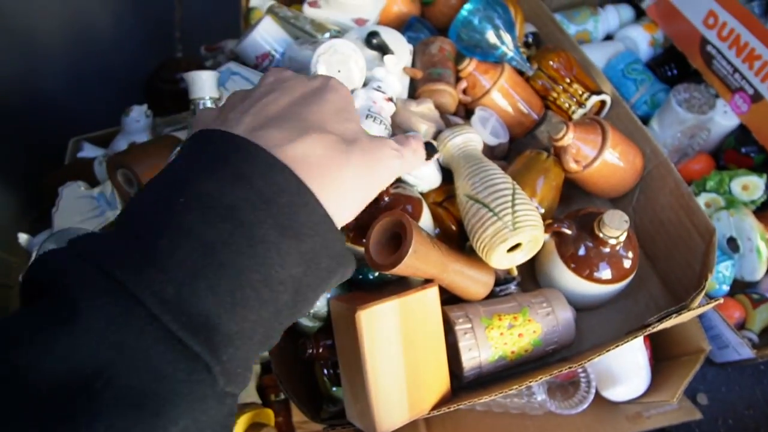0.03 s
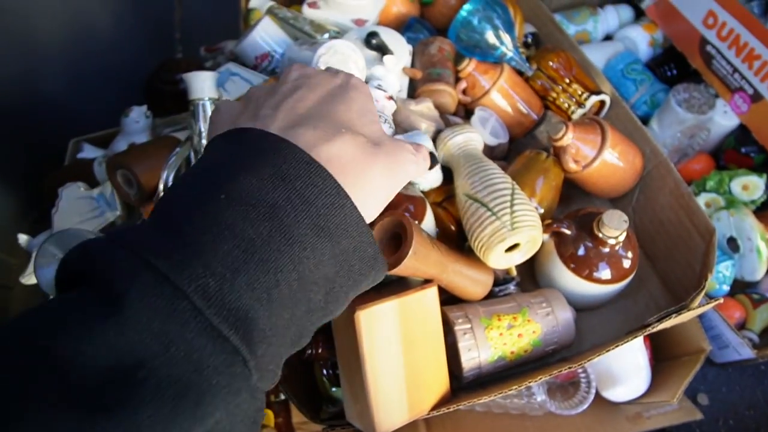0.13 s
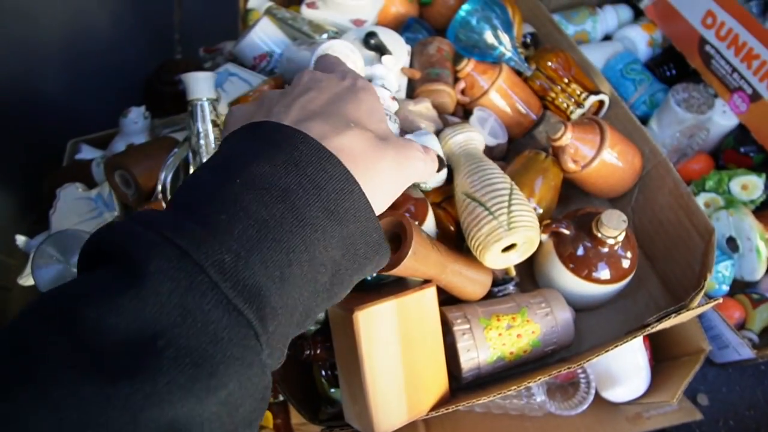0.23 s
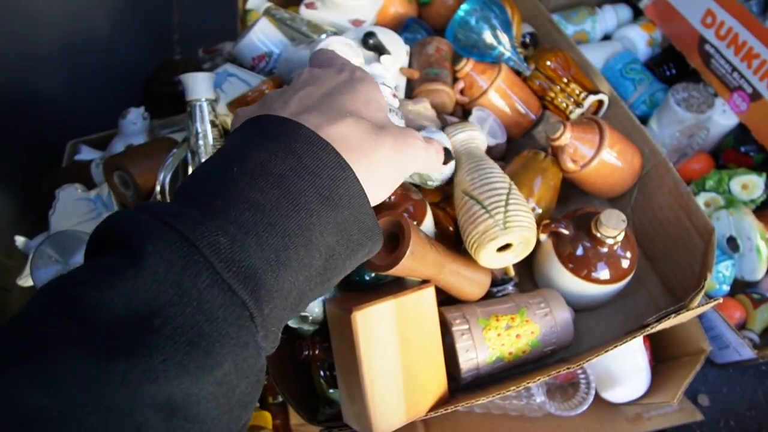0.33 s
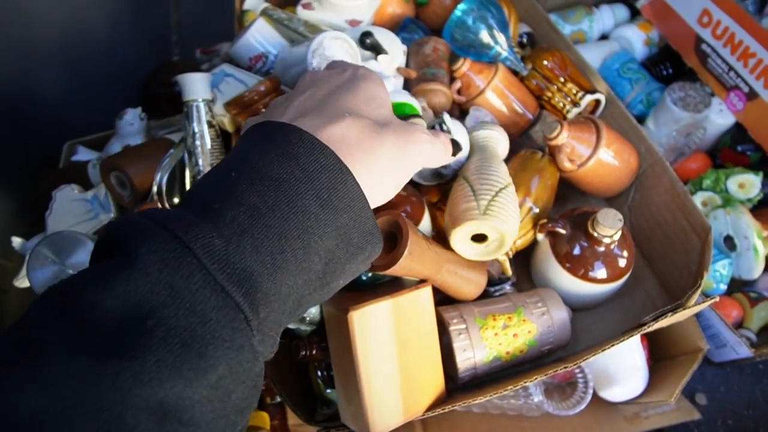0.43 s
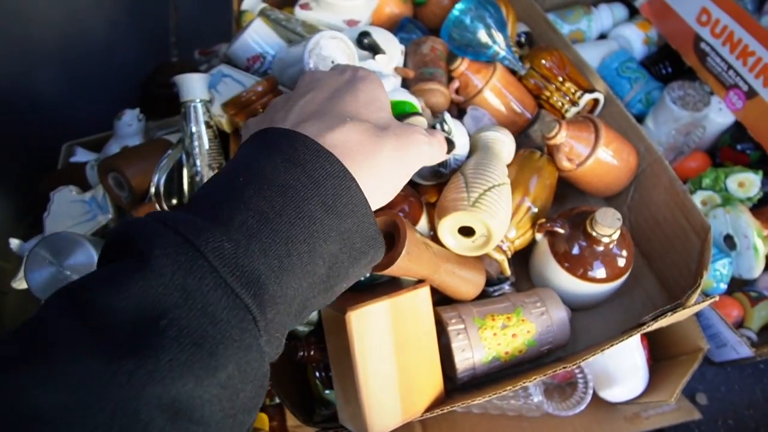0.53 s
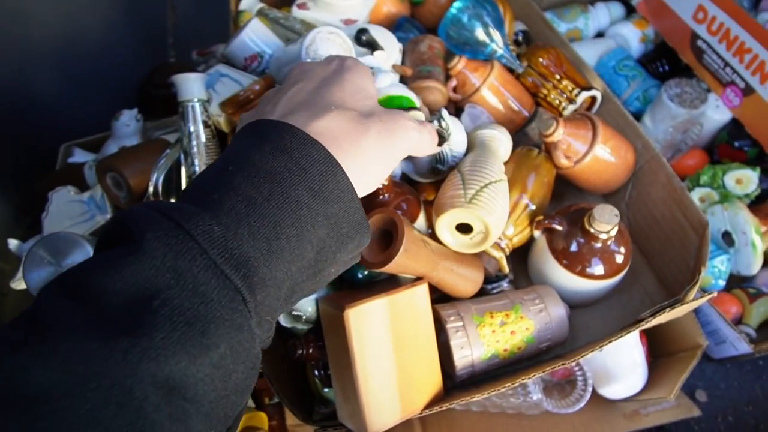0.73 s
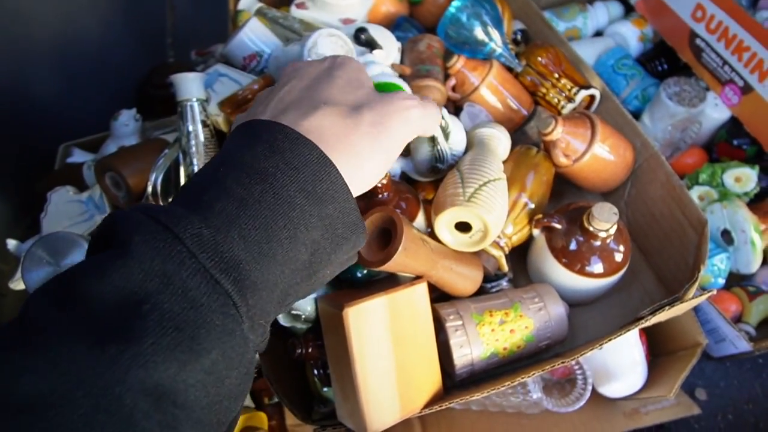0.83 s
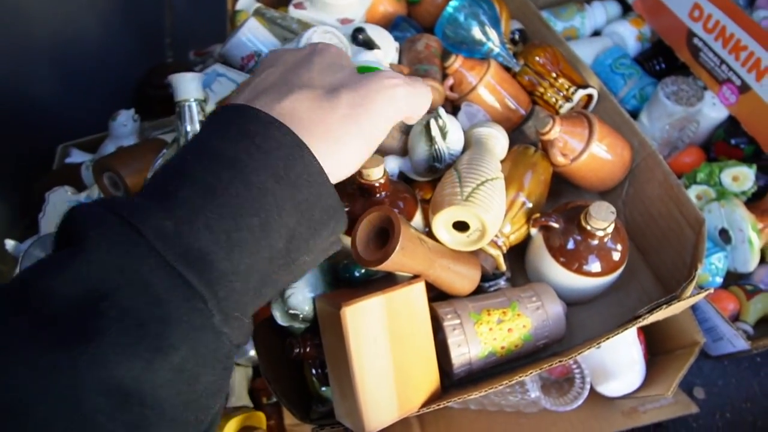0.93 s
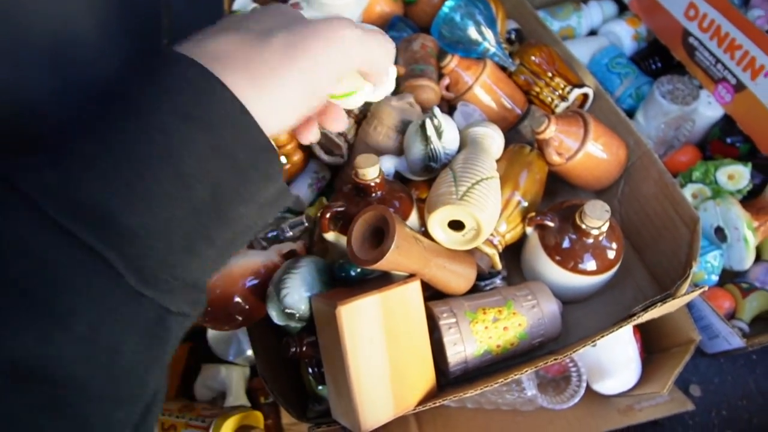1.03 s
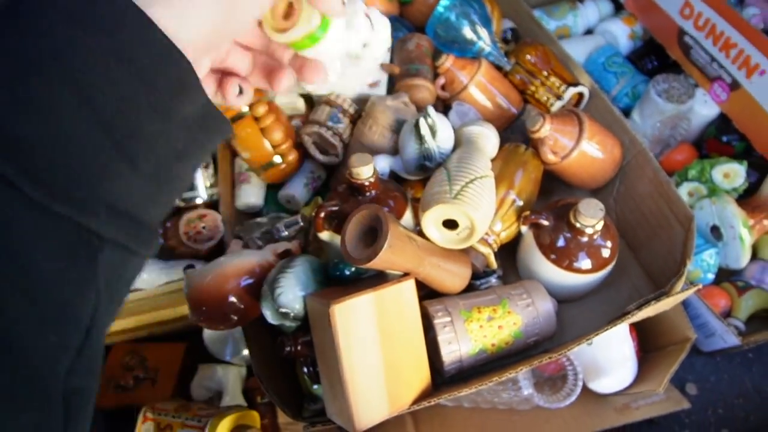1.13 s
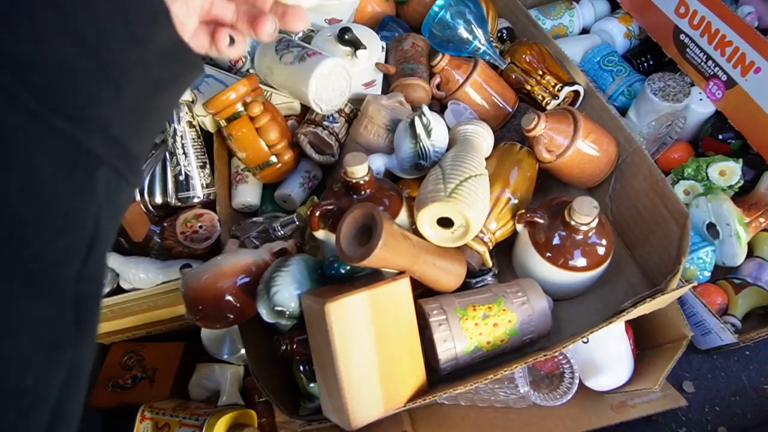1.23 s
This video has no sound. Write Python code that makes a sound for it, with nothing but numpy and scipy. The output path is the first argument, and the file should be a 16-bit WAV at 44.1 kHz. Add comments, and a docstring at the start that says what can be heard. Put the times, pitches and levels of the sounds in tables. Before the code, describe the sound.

Close stereo pickup of ceramic pieces clattering in a cardboard box: faint grating, two bursts of hard clacks with short high clinks, scattered lighter knocks, a tiny hiss of sliding, and a soft closing thud over quiet indoor air.

```python
"""A hand rummages in a cardboard box full of ceramic and glass shakers, close to the microphone, indoors.
Over quiet room noise, glaze first grates on glaze as many tiny slips, and a sleeve's filtered noise swells.
Shakers then knock in quick clusters: contact pulses clack, excite damped modes, scatter through the pile and
thud into the box; some leave thin high rings, and rims tick. Knocks thin out after the densest clusters.
Late on, a gritty hiss swells as a shaker slides along its neighbour and slips off; last comes a dull box knock."""
import sys
import numpy as np
from scipy import signal
from scipy.fft import rfft, irfft
from scipy.io import wavfile

SR = 44100
rng = np.random.default_rng(int(sys.argv[2]) if len(sys.argv) > 2 else 0)


def wrap_up_sound(samples):
    """Save the sound to the file named by the first command line argument, as 16-bit audio."""
    columns = np.atleast_2d(samples).T
    # keep every value between -1 and 1, then stretch to whole-number steps
    tamed = np.clip(columns, -1, 1)
    steps = np.round(tamed * 32767).astype(np.int16)
    wavfile.write(sys.argv[1], SR, steps)


N = 57330  # length in samples

# Spectrum of the steady air noise. Each row: frequency in Hz, relative level in dB.
AIR_SPECTRUM = [(15, -56), (25, -38), (185, -12.5), (384, -7), (863, -3.5), (1740, -8.5), (16000, -35.5)]
# Rustle of the sleeve. Each row: time in seconds, level in dB.
SLEEVE_LEVEL = [(0, -85), (.15, -60), (0.348, -49.5), (.65, -54.5), (.85, -59.5), (1.03, -53.5),
                (1.14, -56.5), (1.18, -60), (1.3, -51.5)]
# Spectrum of sliding cloth. Each row: frequency in Hz, relative level in dB.
CLOTH_SPECTRUM = [(200, -10), (1000, 1), (3000, -3), (5000, 1), (6800, -8.5), (9000, -11.5), (15000, -28.5)]
# Difference signal between the ears. Each row: frequency in Hz, level relative to the middle in dB.
SIDE_SPECTRUM = [(60, -17), (300, -22), (2000, -20), (5000, -11), (12000, -10)]
# Reverberation of the room. Each row: frequency in Hz, time to fall 60 dB in seconds.
ROOM_T60 = [(150, 1), (1000, 0.186), (4000, 0.17), (14000, 0.22)]
# Glaze grating on glaze. Each row: start in seconds, length in seconds, level at the height of the push in dB.
GRATES = [(0.181, 0.14, -40), (0.387, 0.18, -39.5)]
# Spectrum of the grating. Each row: frequency in Hz, relative level in dB.
GRATE_SPECTRUM = [(100, -19), (400, 7.5), (800, 16), (2000, 11.5), (4500, -1.5), (9000, -8), (15000, -39)]
# Light ticks of rim on rim. Each row: start in seconds, level in dB, pitch in Hz.
TICKS = [(.2125, -33, 9800), (0.4364, -21.5, 6900), (1.267, -27.5, 10400), (1.2826, -23.5, 4600)]
# Contacts in the pile. Each row: start in seconds, clack level in dB, contact knee in Hz,
# fall above the knee in dB per octave, box thud level in dB, body that is struck.
KNOCKS = [(0.1948, -4.5, 3300, 23.5, -15.5, "pile"), (.2125, -13, 3830, 14, -15, "vase"),
          (.227, -7.5, 2970, 12, -5, "vase"), (0.2422, 3, 2070, 11, -8, "jar"),
          (0.2466, 3, 2600, 25, -16.5, "jar"), (0.2952, -2.5, 2140, 13, -8.5, "vase"),
          (.399, -12, 750, 19, -27, "pot"), (.445, 8.5, 2770, 15, -6, "pile"),
          (0.4659, 7, 3370, 18, -5, "pile"), (.473, 3, 4100, 29, -4.5, "mug"),
          (0.495, -1, 2010, 10.5, -6, "vase"), (.503, 4.5, 2640, 14, -1, "pile"),
          (.510, 9, 3840, 13, -3, "pile"), (0.523, 1.5, 3230, 21, -11, "pile"),
          (.558, 12.5, 2750, 15.5, -3.5, "jug"), (.5850, 1.5, 2670, 13, -9, "jug"),
          (.589, -5.5, 1390, 27, -18, "pot"), (0.687, -19, 1600, 16, -21.5, "jug"),
          (0.715, -8.5, 1883, 16, -42, "bowl"), (0.7226, -7.5, 1870, 13, -18, "bowl"),
          (0.7883, -12.5, 1940, 14, -22, "jug"), (.899, -7, 4270, 13, -33, "lid"),
          (.906, -17.5, 404, 6, -22.5, "box"), (0.9344, -19, 3260, 11, -27, "mug"),
          (0.979, 6, 4210, 22.5, -10, "mug"), (1.152, -11, 6600, 15.5, -55, "cap"),
          (1.2678, -11.5, 1070, 7.5, -15.5, "box")]
# Damped modes of the bodies wedged in the pile, and of the box.
# Each row of a body: frequency in Hz, relative level in dB, time to fall 60 dB in seconds.
BODY_MODES = {"pile": [(932, 7.5, 0.049), (1170, -4.5, 0.18), (1600, -9, 0.0395), (2290, 1.5, 0.039),
              (2540, -0.5, 0.051)], "jar": [(582, 14, 0.071), (993, 17.5, 0.0457), (1530, 1.5, 0.022),
              (1930, 3, 0.039), (3060, 15, 0.038)], "vase": [(470, 13, .06), (745, 4, .065),
              (1287, -2, .05), (1776, -3, .048), (3200, -4, .025), (4027, -4, .04)], "pot": [(700, 0, .07),
              (1281, -5, .05)], "jug": [(771, 10.5, 0.064), (1106, -3, 0.041), (1730, 10.5, 0.028),
              (2723, 8.5, 0.017), (3780, -1, 0.017)], "mug": [(716, 14.5, 0.13), (1147, 11, 0.18),
              (1437, 9, 0.12), (2060, 8, 0.055), (2690, 18.5, 0.039), (4070, 5, 0.086), (4800, -7, 0.015),
              (5040, 15.5, 0.032)], "lid": [(2300, 10, .038), (2770, 10, 0.014), (4600, -22, 0.11)],
              "bowl": [(1077, 1, .045), (1723, 2, 0.034)], "cap": [(3470, 0, 0.016), (7300, 1.5, 0.0099)],
              "box": [(295, 6, 0.11), (445, 3.5, 0.065), (936, -9, 0.058), (1440, -2, 0.048)]}
# Scattering among the shakers. Each row: frequency in Hz, time to fall 60 dB in seconds.
SCATTER_T60 = [(300, 0.055), (1000, 0.044), (3000, 0.034), (14000, 0.044)]
# Spectrum of the thud in the box. Each row: frequency in Hz, relative level in dB.
BOX_SPECTRUM = [(40, -34), (120, -35), (200, -13), (280, -6), (470, 5), (740, 5), (1100, -7), (2000, -2.5),
                (6000, -49.5)]
# High rings left by some contacts. Each row: start in seconds, level in dB, shaker that rings.
CLINKS = [(.196, -27, "thin"), (.243, -11.5, "china"), (.242, -20, "thin"), (0.266, -18.5, "thin"),
          (.415, -21, "china"), (.445, -16, "glass"), (.466, -8.5, "glass"), (0.472, -9.5, "china"),
          (0.494, -9.5, "china"), (0.5109, 10, "small"), (0.513, 5, "china"), (0.514, -8.5, "glass"),
          (0.559, -1.5, "stoneware"), (.899, -21.5, "lid"), (.979, -14, "china"), (1.268, -29, "lid")]
# Free modes of the ringing shakers.
# Each row of a shaker: frequency in Hz, relative level in dB, time to fall 60 dB in seconds.
RING_MODES = {"china": [(5735, 0, .055), (6021, -10, .06)], "glass": [(8089, 0, .125), (8857, -8, .11),
              (9884, -4, .07), (13430, -25, .12)], "thin": [(8200, 0, .06), (9130, -3, .025),
              (11990, -14, .08)], "small": [(7775, -9, .025), (7937, 0, .033), (12230, -26, .035)],
              "stoneware": [(5421, -1, .04), (5712, 1, .04), (6020, -2, .045), (8086, -9, .08),
              (9916, -8, .058), (13540, -25, .06)], "lid": [(5100, -3, .05), (8830, 0, .1)]}
# Position of the hand in the box. Each row: time in seconds, left level minus right level in dB.
HAND_PAN = [(.3, -0.5), (.56, -1), (.75, -4), (.9, 1.5), (1.0, 0.7), (1.27, -1.5)]
# Position of each ringing shaker. Each entry: shaker, left level minus right level in dB.
RING_PAN_DB = {"china": -6, "glass": -3, "thin": -2.5, "small": -4.5, "stoneware": -3.5, "lid": -3}

AIR_DB, HUM_DB, HUM_HZ, HUM_WIDTH_HZ = -54.5, -70, 191.3, 17.4
AMBIENT_WIDTH_DB = 9  # steady sounds are wider than the knocks
ROOM_DB = -22.5
SCRAPE_DB, SCRAPE_END_S = -47, 1.148  # level at the end, before the grit modulates it
SCRAPE_RISE_S = 0.03  # the level grows by a factor e in this time
SCRAPE_HZ, SCRAPE_WIDTH_HZ, SCRAPE_GRIT_HZ = 6600, 2500, 600
GRATE_SLIPS_PER_S = 1000
TICK_CYCLES = 9.6  # cycles in which a tick falls 60 dB
TICK_SCATTER_DB, TICK_T60_S = -11, 0.045
RISE_DB_PER_OCT, LOW_CUT_HZ = 3, 800  # contact spectrum below its knee
CRACK_DB, CRACK_CYCLES = 1, 8  # the wall flexes at the knee, falling 60 dB in this many cycles
SCATTER_DB, SCATTER_RISE_S = 8.5, 0.00064
BODY_DB = 3.5  # modes, relative to the direct pulse, as are crack and scatter
FORMANT_DB, FORMANT_WIDTH_HZ = 8, 240  # a body passes the contact best near its modes
SHADOW_HZ = 7960  # the hand shades the direct sound above this; the treble arrives by reflections
BOX_RISE_S, BOX_T60_S = 0.003, 0.063
RING_RISE_S = 0.0034
RING_LAG_S = 0.000009  # the left side hears the rings this much later
NEIGHBOURS_DB = -11.5  # touching shakers ring along faintly
NEIGHBOURS_LOW_HZ, NEIGHBOURS_HIGH_HZ = 3300, 10500
NEIGHBOURS_T60_S = 0.03  # middling value: each partial takes 0.5 to 2 times this
EDGE_HZ = 15700


def amp(db):
    """Level law: decibels become an amplitude ratio."""
    return 10 ** (np.asarray(db) / 20)


def unit(x):
    """Energy normalisation: the mean energy per channel becomes one."""
    return x / np.sqrt(np.mean(np.sum(x ** 2, -1)) + 1e-20)


def read(points, hz):
    """Interpolation on a logarithmic frequency axis."""
    table_hz, value = np.transpose(points)
    return np.interp(np.log(hz + 1), np.log(table_hz), value)


def add(mix, start_s, sound):
    """Superposition: a sound is summed into the mix from its start time."""
    part = mix[:, max(round(start_s * SR), 0):][:, :sound.shape[-1]]
    part += sound[..., :part.shape[-1]]


def pan(db):
    """Interaural level difference, split equally between the two channels."""
    return amp(np.array([[db], [-db]]) / 2)


def noise(size, width_db=0):
    """Partial coherence: the two sides share a middle noise, less so in the treble than in the bass."""
    mid, side = rng.standard_normal((2, size))
    side_gain = amp(width_db + read(SIDE_SPECTRUM, np.fft.rfftfreq(size, 1 / SR)))
    side = irfft(rfft(side) * side_gain, size)
    return mid + np.array([side, -side])


def colour(x, points):
    """Spectral filtering of a full-length sound, scaled to an rms of one."""
    gain = amp(read(points, np.fft.rfftfreq(N, 1 / SR)))
    return unit(irfft(rfft(x) * gain, N)) * np.sqrt(N)


def band(centre_hz, width_hz):
    """Narrow-band noise: a Gaussian resonance filters white noise, scaled to an rms of one."""
    hz = np.fft.rfftfreq(N, 1 / SR)
    resonance = np.exp(-((hz - centre_hz) / width_hz) ** 2)
    return unit(irfft(rfft(noise(N)) * resonance, N)) * np.sqrt(N)


def pulse(db):
    """Minimum phase: the causal pulse of this spectrum whose energy arrives earliest."""
    log_gain = np.log(amp(np.maximum(db, db.max() - 100)))
    full = np.concatenate([log_gain, log_gain[-2:0:-1]])  # mirrored to negative frequencies
    response = np.fft.ifft(np.exp(np.conj(signal.hilbert(full)))).real
    return unit(response[:len(db)])


def shaped(x, db):
    """Causal filtering: a short sound is convolved with the minimum-phase pulse of a spectrum."""
    return unit(signal.fftconvolve(x, pulse(db)[None])[:, :x.shape[1]])


def tail(t60, size):
    """Reverberant decay: dense reflections in which each band dies at its own speed."""
    hz, t, z = signal.stft(noise(size), SR, nperseg=128)
    decay = amp(-60 * t / read(t60, hz)[:, None])
    return signal.istft(z * decay, SR)[1][:, :size]


def ring(modes, t):
    """Modal superposition: a sum of exponentially damped sinusoids."""
    partials = (amp(db - 60 * t / t60) * np.sin(2 * np.pi * hz * t) for hz, db, t60 in modes)
    return unit(sum(partials))


def room_noise():
    """Stationary noise: broadband air noise with a narrow band whose beating makes a low wavering hum."""
    air = colour(noise(N, AMBIENT_WIDTH_DB), AIR_SPECTRUM)
    return amp(AIR_DB) * air + amp(HUM_DB) * band(HUM_HZ, HUM_WIDTH_HZ)


def sleeve():
    """Friction noise: cloth slides over the pile with a varying level."""
    level_db = np.interp(np.arange(N) / SR, *np.transpose(SLEEVE_LEVEL))
    return amp(level_db) * colour(noise(N, AMBIENT_WIDTH_DB), CLOTH_SPECTRUM)


def scrape():
    """Sliding friction: a lifted shaker hisses along its neighbour, swelling and gritty, until it slips off."""
    t = np.arange(N) / SR - SCRAPE_END_S
    swell = np.exp(-abs(t) / SCRAPE_RISE_S) * (t < 0)
    grit = abs(band(0, SCRAPE_GRIT_HZ)[0])
    return amp(SCRAPE_DB) * swell * grit * band(SCRAPE_HZ, SCRAPE_WIDTH_HZ)


def grating(spread_db=-0.5):
    """Stick-slip friction: random tiny slips of glaze on glaze while the pile shifts."""
    t = np.arange(N) / SR
    happens = rng.random(N) < GRATE_SLIPS_PER_S / SR
    strength = amp(spread_db * np.minimum(rng.exponential(1, N), 3))
    slips = noise(N) * happens * strength
    push = np.zeros(N)
    for start_s, length_s, db in GRATES:
        progress = np.clip((t - start_s) / length_s, 0, 1)
        push += amp(db) * np.sqrt(abs(np.sin(np.pi * progress)))
    return push * colour(slips, GRATE_SPECTRUM)


def ticks():
    """Heavily damped resonance: rims flick past each other in tiny dry snaps, too light to shake the pile."""
    out, t = np.zeros((2, N)), np.arange(SR // 20) / SR
    spectrum_hz = np.fft.rfftfreq(len(t), 1 / SR) + 1
    for start_s, db, hz in TICKS:
        scatter = unit(noise(len(t)) * amp(-60 * t / TICK_T60_S))
        snap = ring([(hz, 0, TICK_CYCLES / hz)], t) + amp(TICK_SCATTER_DB) * scatter
        peak_db = -10 * np.log10(1 + (np.log2(spectrum_hz / hz) * 2) ** 2)
        add(out, start_s, amp(db) * shaped(snap, peak_db))
    return out


def neighbours(t, count=14):
    """Sympathetic vibration: irregular partials of the touching shakers, fainter towards the top."""
    partials_hz = np.exp(rng.uniform(np.log(NEIGHBOURS_LOW_HZ), np.log(NEIGHBOURS_HIGH_HZ), count))
    modes = [(hz, -20 * np.log10(hz / NEIGHBOURS_LOW_HZ), NEIGHBOURS_T60_S * rng.uniform(0.5, 2))
             for hz in partials_hz]
    return ring(modes, t)


def clink(shaker):
    """Free vibration: a struck shaker rings in its high modes, and its neighbours ring along."""
    t = np.arange(SR // 4) / SR
    ears = np.array([t - RING_LAG_S, t])
    # each contact lands elsewhere, so the modes are excited unequally
    struck = [(hz, db + rng.uniform(-2, 1.6), t60) for hz, db, t60 in RING_MODES[shaker]]
    both = ring(struck, ears) + amp(NEIGHBOURS_DB) * neighbours(ears)
    return unit(both * (1 - np.exp(-t / RING_RISE_S)))


def knock(db, knee_hz, fall, thud_db, body, size=6144):
    """Impact excitation: a contact pulse cracks, rings the body, scatters in the pile and thuds into the box."""
    t, hz = np.arange(size) / SR, np.fft.rfftfreq(size, 1 / SR) + 1
    octaves = np.log2(hz / knee_hz)
    contact = RISE_DB_PER_OCT * np.minimum(octaves, 0) - fall * np.maximum(octaves, 0)
    contact -= 20 * np.log10(1 + (LOW_CUT_HZ / hz) ** 2)
    peaks = [np.exp(-((hz - mode[0]) / FORMANT_WIDTH_HZ) ** 2) for mode in BODY_MODES[body]]
    formants = FORMANT_DB * np.max(peaks, 0)
    shadow = -10 * np.log10(1 + (hz / SHADOW_HZ) ** 2)

    impulse = (t == 0)[None] * 1.0
    direct = shaped(impulse, contact + shadow)
    crack = shaped(ring([(knee_hz, 0, CRACK_CYCLES / knee_hz)], t)[None], contact)
    reflections = tail(SCATTER_T60, size) * (1 - np.exp(-t / SCATTER_RISE_S))
    scatter = shaped(reflections, contact + formants)
    modes = shaped(ring(BODY_MODES[body], t)[None], contact)
    clack = unit(direct + amp(CRACK_DB) * crack + amp(SCATTER_DB) * scatter + amp(BODY_DB) * modes)

    shake = noise(size) * (1 - np.exp(-t / BOX_RISE_S)) * amp(-60 * t / BOX_T60_S)
    thud = shaped(shake, read(BOX_SPECTRUM, hz))
    return amp(db) * clack + amp(thud_db) * thud


def shakers():
    """Superposed impacts: all the knocks, and the high free vibrations that some contacts leave."""
    out = np.zeros((2, N))
    for start_s, *contact in KNOCKS:
        hand_db = np.interp(start_s, *np.transpose(HAND_PAN))
        add(out, start_s, pan(hand_db) * knock(*contact))
    for start_s, db, shaker in CLINKS:
        add(out, start_s, pan(RING_PAN_DB[shaker]) * amp(db) * clink(shaker))
    return out


def scene():
    """Direct and reverberant sound: the box of shakers in a fairly dead room, over the steady sounds."""
    near = shakers() + ticks() + grating() + scrape()
    room = signal.fftconvolve(near, unit(tail(ROOM_T60, size=SR // 2)), axes=1)[:, :N]
    return near + amp(ROOM_DB) * room + sleeve() + room_noise()


def record(dry):
    """Band limitation: a linear-phase low-pass filter sets the recorder's upper edge."""
    low_pass = signal.firwin(401, EDGE_HZ, window=("kaiser", 9), fs=SR)
    return signal.oaconvolve(dry, low_pass[None], "same")


dry = scene()
out = record(dry)
wrap_up_sound(out)
```